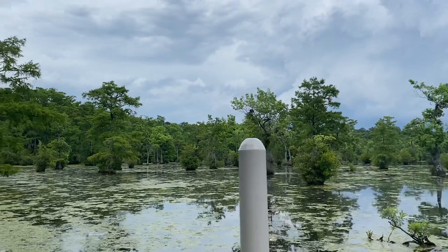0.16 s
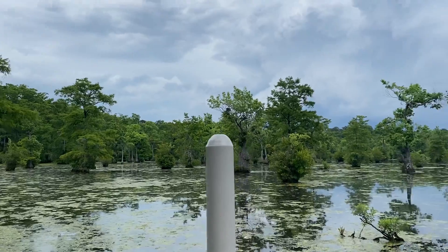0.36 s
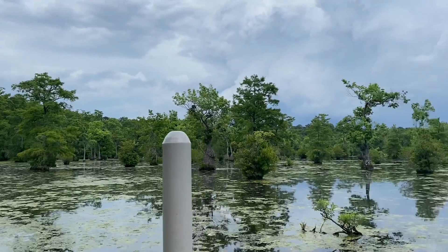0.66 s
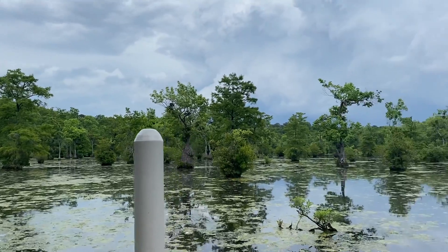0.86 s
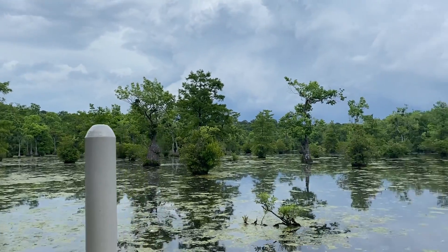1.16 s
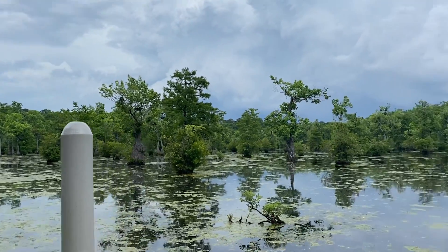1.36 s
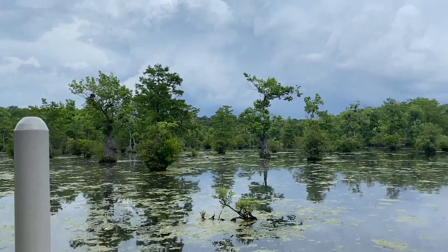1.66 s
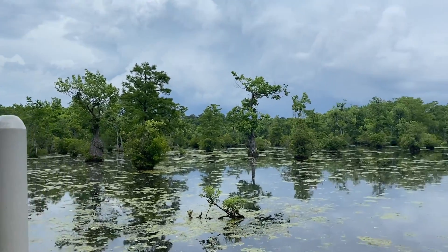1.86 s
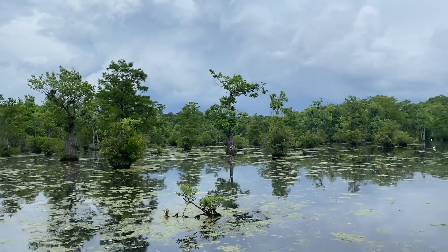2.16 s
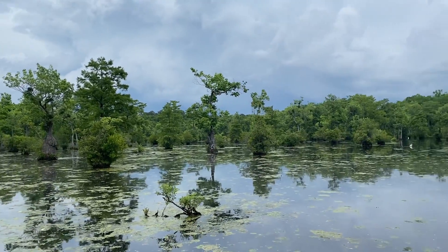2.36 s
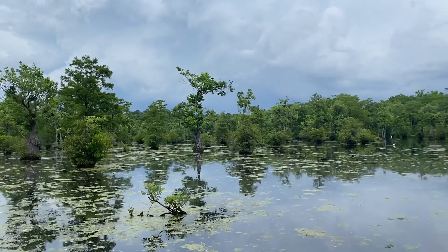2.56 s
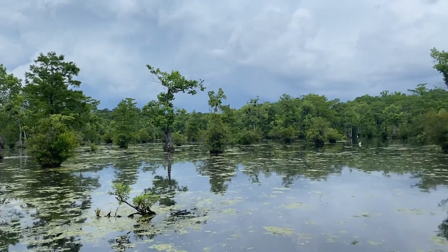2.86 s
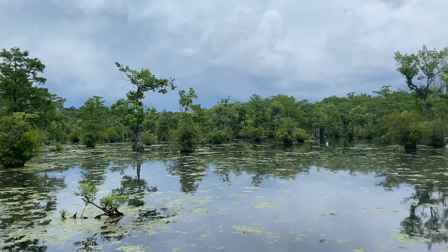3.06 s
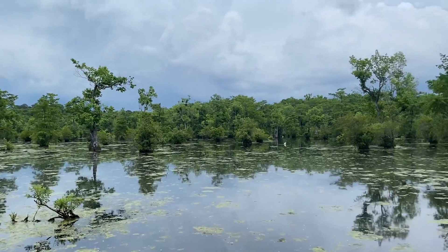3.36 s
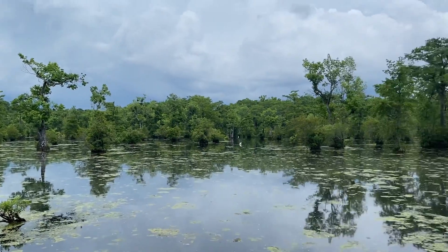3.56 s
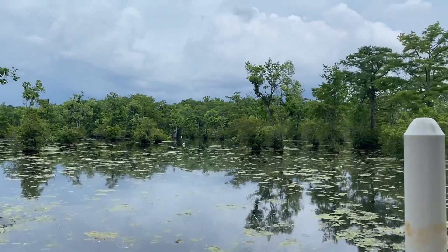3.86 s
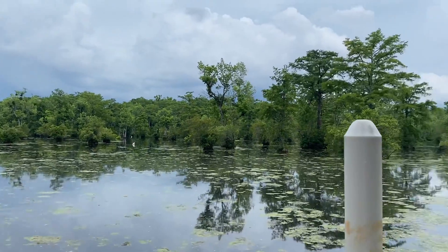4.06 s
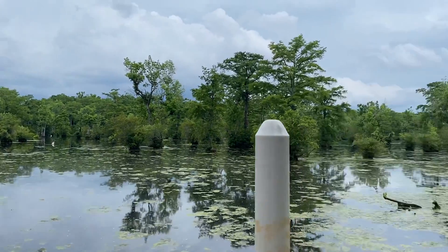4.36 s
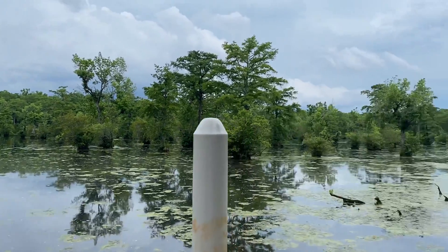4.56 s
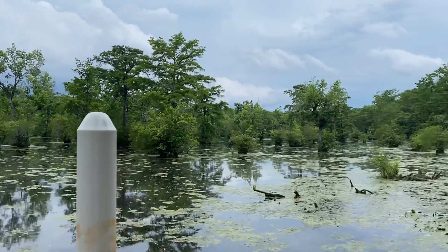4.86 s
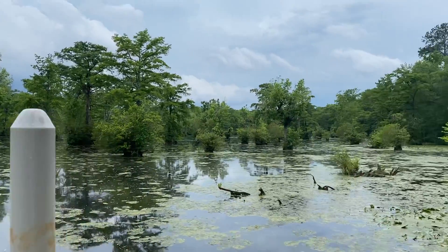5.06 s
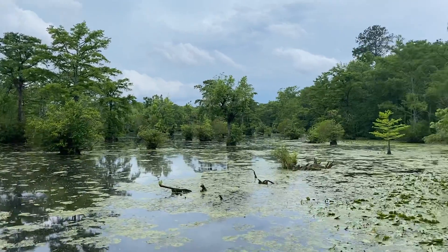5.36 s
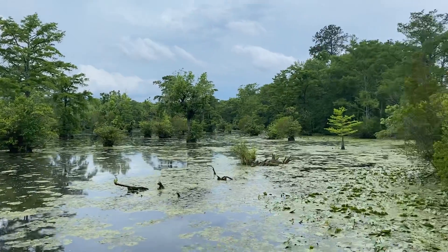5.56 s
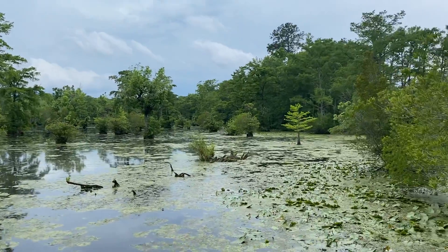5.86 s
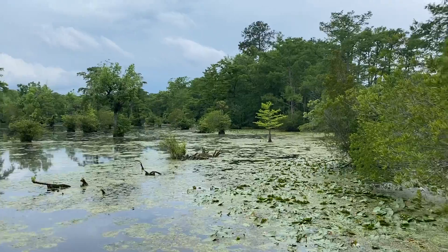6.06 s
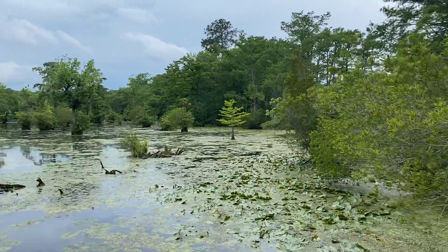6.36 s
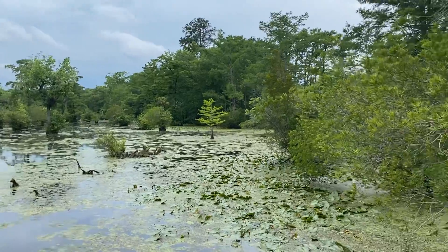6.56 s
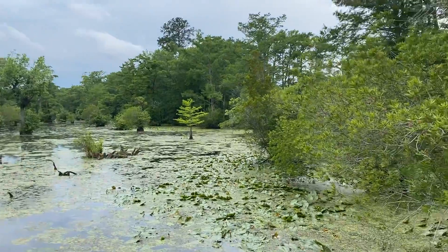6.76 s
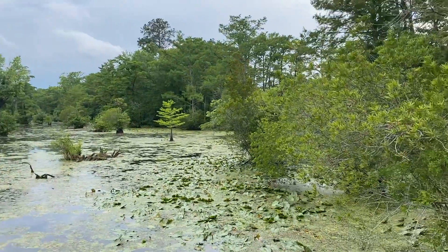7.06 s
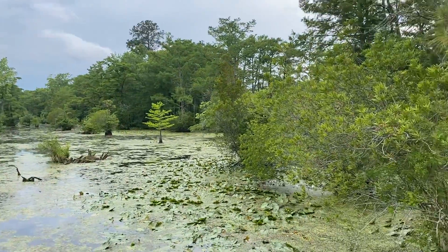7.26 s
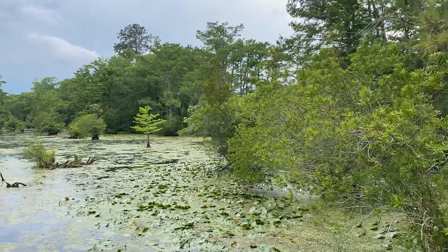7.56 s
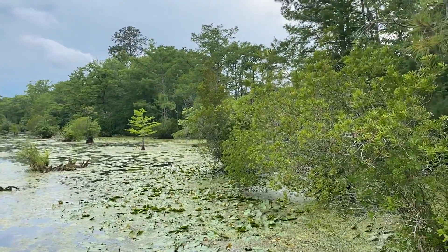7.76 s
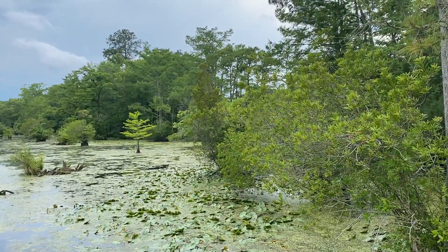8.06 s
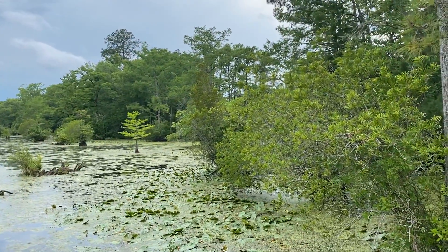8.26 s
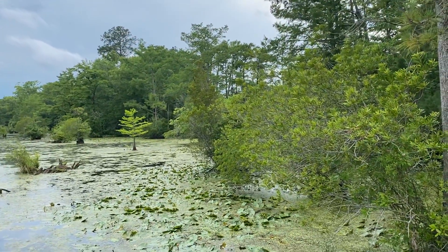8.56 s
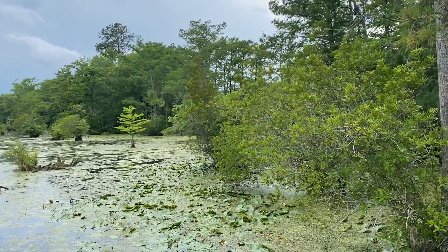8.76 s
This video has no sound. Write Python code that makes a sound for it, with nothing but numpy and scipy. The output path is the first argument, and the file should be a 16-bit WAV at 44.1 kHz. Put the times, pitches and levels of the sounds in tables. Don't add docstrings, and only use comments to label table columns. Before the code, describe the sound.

Many small frogs click and trill in short high bursts over still water, with sharp close snaps growing louder above a faint low rumble.

```python
import sys
import numpy as np
from scipy import signal
from scipy.fft import rfft, irfft
from scipy.io import wavfile
from scipy.ndimage import uniform_filter1d, map_coordinates

SR = 44100
rng = np.random.default_rng(int(sys.argv[2]) if len(sys.argv) > 2 else 0)


def log_audio(samples):
    frames = np.atleast_2d(samples).T
    limited = np.clip(frames, -1, 1)
    pcm = np.round(limited * 32767).astype(np.int16)
    wavfile.write(sys.argv[1], SR, pcm)


def volts_from_decibels(level):
    exponent = np.asarray(level, float) / 20
    return 10 ** exponent


N = 392490

# (time [s], peak [dB], left-right [dB], body noise [dB], sac pitch [Hz])
SNAPS = [
    (.833, -41.5, 11, -31, 3690),
    (2.8545, -35.5, 8.5, -34, 3480),
    (4.3304, -33.5, -0.5, -41, 3880),
    (4.9272, -26, 1, -42, 3750),
    (5.5715, -27, -1.5, -34, 3710),
    (6.0093, -29.5, -1, -25, 3770),
    (6.78, -24, 3, -33, 3660),
    (7.6008, -24.5, 2, -30.5, 3730),
    (8.239, -23.5, 1.5, -31, 3733),
    (8.8802, -20, 2, -34.5, 3826),
]
SIDE_SNAPS = [
    (3.7057, -38.5, 10, -28.5, 3550),
    (3.8594, -41.5, 11, -26, 3590),
    (6.1576, -32.5, 6.5, -25.5, 3585),
    (6.8818, -35.5, 1.5, -17, 3530),
    (7.7321, -34, 3.5, -19, 3400),
    (8.5464, -33, 3, -18, 3480),
]
# (low mode [dB], bright crack [dB])
SNAP_VOICES = [
    (-16, -28.5),
    (-8.5, -20.5),
]
# (multiple of sac pitch, level [dB], time to fall 60 dB [s])
SNAP_MODES = [(1, -2.5, 0.0096), (1.08, -3.5, 0.0076), (1.6, -25.5, 0.015)]
# (delay [s], level [dB])
SNAP_REPEATS = [(.0021, -6), (.0046, -11.5), (.0072, -15)]
# (frequency [Hz], level per Hz [dB])
SNAP_CRACK = [(2500, -50.5), (4500, 8), (6200, -4), (8000, -6), (10000, -19), (12000, -29), (14000, -17.5),
              (15700, -29)]
SNAP_BODY = [(600, -64), (1200, -17.5), (1500, -8), (2500, 0.5), (3500, 5.5), (4800, -7.5), (6000, -28.5),
             (9000, -75)]

# (time [s], peak [dB], length [s], tick ahead by [s])
SLOW_FROG = [
    (.0499, -45, .05, 0.029),
    (.636, -36, .066, 0.011),
    (1.2225, -33.5, .058, 0.0079),
    (1.769, -31.5, .05, 0.0088),
    (2.3901, -34, .04, 0.024),
    (2.9786, -34, .042, 0.026),
]
QUICK_FROG = [(2.036, -31.5, 0.016, 0.04), (2.608, -34, .024, 0.046), (3.1967, -33.5, .025, .0347),
              (3.4045, -30.5, .024, 0.047), (3.603, -33, .012, 0.042), (3.7878, -35.5, .024, 0.038),
              (3.991, -41, .028, 0.059), (4.378, -36, .018, 0.015), (4.5747, -37.5, .028, 0.055),
              (4.788, -32.5, .023, 0.036), (4.9876, -32.5, .02, .0428), (5.1736, -31, .025, .0318),
              (5.366, -31.5, .021, 0.045), (5.5674, -30.5, 0.0073, 0.034), (5.753, -33.5, .021, 0.029)]
# (sac pitch [Hz], rasp [dB], fade over the call [dB])
FROG_VOICES = [(3640, -23, -8), (3660, -27, -6)]
# (level against the call [dB], sac pitch [Hz], length [s], rasp [dB])
TICKS = [(-7, 3570, .003, -15), (-6, 3540, .009, -27.5)]
# (time [s], peak [dB], length [s], sac pitch [Hz])
SMALL_FROGS = [(.002, -48, .006, 3210), (.3, -52.5, .04, 2844), (.03, -52, .045, 2850),
               (.124, -46, .006, 3800), (0.167, -40.5, .007, 4250), (0.7635, -35.5, 0.007, 4145),
               (1.364, -36.5, .01, 3950), (1.924, -40.5, .016, 3990), (2.221, -48.5, .045, 4400),
               (2.262, -56, .02, 4440), (1.349, -47, .012, 3990), (1.186, -51, .004, 3460),
               (3.757, -40, .003, 3410), (5.333, -39, .003, 3490), (5.731, -39, .003, 3200),
               (2.364, -37, .003, 3630), (2.374, -42, .004, 3199), (2.717, -41.5, .019, 3920),
               (3.258, -45.5, .017, 4080), (4.9077, -34, .023, 4012), (5.106, -38.5, .011, 3917),
               (5.4587, -36, .022, 4091), (5.721, -37, .003, 3540), (5.744, -43, .035, 4370),
               (5.974, -39.5, .034, 3950), (6.5675, -37, .023, 4050), (6.6093, -36.5, .02, 3930),
               (6.846, -49, .041, 3980), (7.1483, -31, .019, 3940), (7.281, -35.5, .019, 3950),
               (7.545, -43, .003, 4160), (7.688, -35.5, .04, 4180), (8.256, -35, .038, 4060),
               (8.328, -36, .018, 4034)]
# (time [s], peak [dB], length [s], sac pitch [Hz], fade over the call [dB])
MIDDLE_FROGS = [(0.437, -50, 0.02, 3670, -10), (0.7218, -44, 0.022, 3775, -11),
                (0.844, -45.5, 0.035, 3750, -8.0), (1.4824, -47.5, 0.019, 3810, -7),
                (1.7243, -38, 0.015, 3780, -10), (1.8956, -38, 0.006, 3750, 7), (1.9, -39, 0.018, 3720, -9),
                (2.167, -46.5, 0.013, 3710, -9), (2.7759, -46.5, 0.04, 3870, -2),
                (2.842, -48, 0.012, 3740, 6.0), (2.926, -48, 0.02, 3610, -5),
                (4.1309, -46.5, 0.01, 3790, -9.0), (4.177, -46, 0.0084, 3460, -2),
                (4.36, -40, 0.018, 3740, 6), (4.52, -46, 0.011, 3645, -6), (4.859, -48, 0.04, 3560, -8),
                (4.957, -37, 0.026, 3880, -8), (5.017, -37.5, 0.025, 3780, -7), (5.17, -41, 0.006, 3590, 5),
                (5.685, -44.5, 0.027, 3840, -11), (5.738, -36.5, 0.015, 3600, 3),
                (5.773, -43, 0.034, 3800, -6), (5.8435, -38.5, 0.014, 3750, -0.5),
                (5.857, -35, 0.011, 3825, -7), (5.95, -42.5, 0.009, 3700, -12),
                (6.0857, -45, 0.035, 3650, -9), (6.4592, -37.5, 0.042, 3720, -1),
                (6.65, -40.5, 0.025, 3710, -2), (6.6976, -37, 0.01, 3690, -11.0),
                (7.063, -43.5, 0.016, 3765, -3), (7.3144, -43, 0.028, 3777, -5),
                (7.554, -40, 0.03, 3760, -9), (7.6375, -35.5, 0.009, 3910, -11),
                (8.035, -51, 0.014, 3840, -6), (8.172, -43, 0.028, 3618, 5), (8.2, -41.5, 0.03, 3640, -10),
                (8.373, -42, 0.035, 3686, 1), (8.414, -37, 0.011, 3810, -15),
                (8.612, -42.5, 0.017, 3770, -11)]
LARGE_FROGS = [(0.2637, -43.5, 0.016, 3680, -11.0), (0.469, -43, 0.022, 3640, -9),
               (0.7799, -42, 0.024, 3690, -4), (0.8937, -40.5, 0.03, 3570, -11.0),
               (1.1373, -43, 0.025, 3650, -10), (1.3016, -41, 0.013, 3740, -9),
               (1.639, -42.5, 0.025, 3685, -7), (1.866, -46, 0.01, 3610, -1.0),
               (2.4862, -40.5, 0.036, 3650, -5), (2.52, -44, 0.022, 3640, -9),
               (2.953, -45, 0.0076, 3560, -11), (3.106, -43, 0.019, 3760, -8), (3.31, -44, 0.027, 3690, -5),
               (3.9738, -46, 0.0056, 3660, -13), (4.208, -42, 0.048, 3600, 0), (4.34, -41, 0.017, 3820, -6),
               (4.493, -48.5, 0.027, 3660, -7.0), (5.2724, -41, 0.028, 3780, -4),
               (6.206, -42, 0.03, 3710, 1), (6.287, -44, 0.052, 3660, -11), (7.033, -45, 0.028, 3630, 5.5),
               (7.1236, -41.5, 0.0033, 3455, -2), (7.131, -34, 0.017, 3640, 1.5),
               (7.745, -44.5, 0.03, 3660, -8.0), (7.825, -37.5, 0.018, 3630, 1),
               (7.844, -37, 0.024, 3766, -8), (8.1255, -41, 0.035, 3720, -6), (8.514, -43.5, 0.03, 3740, 3),
               (8.5858, -36.5, 0.03, 3680, 1.5), (8.795, -41.5, 0.039, 3760, -5)]
# (frequency [Hz], level per Hz [dB])
RASP_COLOUR = [(900, -42), (1500, -18), (2450, -15), (2800, -2), (4400, -4), (5500, -12), (6200, -17),
               (7300, -18), (8400, -23), (10300, -39), (12000, -42.5), (14000, -40), (15700, -58)]
# (frequency [Hz], level [dB])
WATER_CANCEL = [(1000, -1.5), (1900, -2), (2450, -4.5), (2800, 0.5), (4300, -0.5), (4800, -2.5), (6500, 0),
                (16000, 0)]
# (time [s], left leads by [radians], left-right [dB])
BEARING = [(0, -1.2, 2), (1, -2.3, 7), (1.5, -2.8, 9), (2.5, -2.1, 9), (3.7, -1.9, 8), (4.2, -.5, 3),
           (5, .5, 1), (5.6, 1.2, 2.5), (6.1, 1.4, 4.5), (6.5, .3, 3.5), (7, .8, 3.5), (8.9, .7, 3.5)]

# (time [s], level [dB])
FAR = [(0.0, -53), (0.45, -63), (1.1, -63), (1.5, -61), (2.3, -62.5), (3.17, -59.5), (3.47, -56),
       (4.1, -57), (4.83, -59), (4.96, -61.5), (5.77, -52.5), (6.49, -61.5), (6.64, -56.5), (7.56, -61.5),
       (7.71, -57.5), (8.13, -64), (8.33, -54), (8.9, -62.5)]
# (time [s], level [dB])
FACING = [(0, -3.5), (2.3, -5), (3.3, 3.5), (4.5, 1), (6, 2), (8.9, -1)]
# (frequency [Hz], time to fall 60 dB [s])
TREES = [(1000, 0.6), (4000, 0.29), (7000, 0.36), (10000, .16)]

# (time [s], peak [dB], pitch [Hz], time
# to fall 60 dB [s], roughness)
KNOCKS = [(.138, -67, 800, 0.02, 1.9), (.168, -62, 905, 0.023, 3.2), (.2555, -43, 600, 0.039, 0.19),
          (.362, -63.5, 1214, 0.051, 2.9), (3.121, -54, 784, 0.033, 2), (4.028, -62, 1700, .02, 3),
          (4.041, -57, 1690, 0.026, 3), (4.059, -54.5, 1320, 0.037, 3.2), (4.925, -55, 915, 0.057, 2.5),
          (5.662, -53, 1080, 0.1, 3.6), (5.739, -59.5, 590, 0.048, 2.2), (5.77, -51, 1850, 0.032, 0.91),
          (5.851, -54.5, 910, 0.024, 0.48), (5.99, -61, 870, 0.045, 0.65), (6.312, -49, 1433, 0.036, 0.65),
          (6.314, -52, 1107, 0.051, 1.2), (6.313, -53, 750, .04, 1.6), (6.315, -53, 398, 0.056, 0.9),
          (.257, -54, 400, .05, 0.88), (2.302, -72, 6940, 0.009, 5.8), (8.077, -61.5, 1700, 0.036, 1)]
# (time [s], peak [dB], pitch [Hz], time to fall 60 dB [s])
THUMPS = [
    (3.126, -50.5, 148, 0.098),
    (4.926, -41, 106, 0.11),
    (6.308, -51, 200, 0.052),
    (7.247, -28.5, 81, 0.058),
]
# (time of peak [s], level [dB], rise [s], fall [s])
CREAKS = [
    (.266, -63, 0.0079, 0.083),
    (5.676, -70, 0.14, .045),
    (6.43, -59, 0.13, .09),
    (6.53, -66.5, 0.053, 0.058),
    (6.34, -66, .02, .05),
]
# (time [s], level [dB], length [s])
RUSTLES = [(1.3, -92, .06), (1.44, -86, .008), (3.221, -76, .005), (3.225, -86, .025), (7.61, -80, .035),
           (6.79, -82, .06), (6.89, -80, .03), (7.74, -82, .05), (5.658, -74, 0.043), (5.715, -79.5, 0.066),
           (6.328, -73, 0.0055), (6.338, -76, .004), (6.349, -70, .005), (6.372, -75.5, 0.11),
           (7.116, -78, 0.095), (7.826, -80, 0.055), (8.56, -79, 0.086)]

# (time [s], level [dB])
BREEZE = [
    (7.2, -100),
    (7.5, -78),
    (8.0, -81),
    (8.5, -82.5),
    (8.9, -80.5),
]
# (frequency [Hz], level per Hz [dB])
LEAVES = [(500, -31), (850, -0.5), (1100, 0), (1500, -10), (2500, -29), (5000, -70)]
BOUGHS = [(120, -29.5), (250, 1), (570, 0), (1200, -6), (2200, -14), (4000, -29), (6000, -72)]
AIR = [(150, -17), (330, -4.5), (570, 1), (1200, -13), (2100, -12.5), (5000, -26), (7500, -29.5),
       (9200, -25.5), (11000, -30), (13000, -43), (15500, -59)]
RUMBLE = [(15, -49.5), (25, -21.5), (40, -6), (59, 1.5), (87, 0), (116, -6), (175, -14), (240, -22.5),
          (323, -32), (500, -54.5), (900, -110)]
# (time [s], level [dB])
GROUND = [(0, -51.5), (.9, -55), (2.36, -54.5), (2.91, -51), (3.61, -57.5), (4.07, -53), (7.2, -53),
          (8.65, -55), (8.9, -52)]

# (frequency [Hz], likeness 0 to 1)
ALIKE = [(40, 1), (125, 0.94), (300, 0.66), (700, 0.5), (2000, 0.52), (12000, 0.57)]
# (frequency [Hz], left leads by [radians])
PORTS = [(300, 0), (600, -1.1), (1460, -2), (4000, 0), (6500, -1), (14000, 0.5)]
# (frequency [Hz], share)
ONE_PATH = [(4600, 0.022), (6400, 0.55), (8000, 0.77)]
# (frequency [Hz], left leads by [radians])
PATH_LEAD = [(6700, 0), (8450, -3.14), (10200, -6.28), (11900, -9.42), (13900, -12.57), (15700, -15.7)]

SHADE_PER_DB = 0.9
THROAT_PER_DB = 0.5
LAST_PULSES_DB = -4.5
SMALL_RASP_DB, MIDDLE_RASP_DB, LARGE_RASP_DB = -25, -20.5, -22
SMALL_FADE_DB, USUAL_FADE_DB = -3.5, -9.5
QUICK_ECHO_DB, OTHERS_ECHO_DB = -9, -6.5
AIR_DB, AIR_FOLLOWS = -75.5, 0.4
BOUGHS_DB = 8
GROUND_PAN_DB = -1
EARS = np.array([[0.5], [-0.5]])


def unit(x):
    return x / np.sqrt(np.mean(x ** 2) + 1e-20)


def along(points, hz):
    f, v = np.transpose(points)
    return np.interp(np.log(hz + 1), np.log(f + 1), v)


def curves(rows):
    s, *cols = np.transpose(rows)
    return [np.interp(np.arange(N) / SR, s, c) for c in cols]


def wobble(rate):
    knots = rng.standard_normal(int(N * rate / SR) + 4)
    return map_coordinates(knots, [np.arange(N) * rate / SR])


def coloured(x, spectrum):
    cep = irfft(np.log(volts_from_decibels(along(spectrum, np.fft.rfftfreq(2048, 1 / SR)))))
    cep[1:1024] *= 2
    cep[1025:] = 0
    h = irfft(np.exp(rfft(cep)))[:1024]
    h = h / np.linalg.norm(h)
    return signal.fftconvolve(x, h[None], axes=1)[:, :x.shape[1]]


def laid(s, waves):
    at = np.round(s * SR).astype(int)[:, None] + np.arange(waves.shape[1])
    return np.bincount(at.ravel(), waves.ravel(), N + SR)[:N]


def swell(t, rise):
    return 1 - np.exp(-t / rise)


def close_frog():
    t = np.arange(1600) / SR
    out = np.zeros((2, N + SR))
    groups = zip((SNAPS, SIDE_SNAPS), SNAP_VOICES)
    snaps = [(*row, *voice) for rows, voice in groups for row in rows]
    for s, db, pan_db, body_db, sac_hz, low_db, bright_db in snaps:
        pulse = 0
        for multiple, level, t60 in SNAP_MODES:
            mode_hz = sac_hz * multiple * rng.normal(1, 0.012)
            pulse = pulse + volts_from_decibels(level + rng.normal(0, 3.0) - 60 * t / t60) * np.sin(2 * np.pi * mode_hz * t)
        pulse = pulse * swell(t, 0.00046) ** 2
        ring = pulse
        for later, level in SNAP_REPEATS:
            wait = round(later * rng.normal(1, 0.07) * SR)
            ring = ring + volts_from_decibels(level + rng.normal(0, 1.7)) * np.pad(pulse, (wait, 0))[:len(t)]
        ring = ring / np.abs(ring).max()

        low_hz = 0.775 * sac_hz * rng.normal(1, 0.025)
        low = np.sin(2 * np.pi * low_hz * t - 13 * np.exp(-t / 0.0033))
        low = low * volts_from_decibels(low_db + 15.0 - 60 * t / 0.022) * swell(t, 0.0018) ** 2

        hiss = rng.standard_normal(len(t)) + 0.89 * rng.standard_normal((2, len(t)))
        puff = volts_from_decibels(-60 * t / 0.042) * swell(t, 0.00058) * hiss
        body = volts_from_decibels(body_db + 10.5) * coloured(puff, SNAP_BODY)
        crack = volts_from_decibels(bright_db + 10.5 - SHADE_PER_DB * abs(pan_db)) * coloured(puff, SNAP_CRACK)

        snap = ring + low * volts_from_decibels([[-1.5], [1.5]]) + body + crack
        out[:, round(s * SR):][:, :len(t)] += volts_from_decibels(db - 1.5 + EARS * pan_db) * snap
    return out[:, :N]


def frogs(calls, rasp_db, low_db, rise=0.00085, ring=0.0082):
    s, db, hz, length, harsh_db, fade_db = np.transpose(calls)[:, :, None]
    k = np.arange(20)
    late, strong, sharp = rng.standard_normal((3, len(calls), 20))
    turn, haste, throaty, raspy, aside, shrill = rng.standard_normal((6, len(calls), 1))
    long_call = length > 0.046

    rate = 285 + 0.08 * (hz - 3700) - 900 * length + 18 * haste
    since = k / rate * (1 + 0.01 * k) + 0.00015 * late * (k > 0)
    size = volts_from_decibels(db - np.maximum(fade_db, 0) + fade_db * since / (length + 0.0078) + 1.3 * strong)
    size = size * volts_from_decibels(-9 * np.exp(-since / 0.011) * long_call)
    size = size * volts_from_decibels(LAST_PULSES_DB * (since / (length + 0.004)) ** 4)
    on = since < length

    def pick(v):
        return np.broadcast_to(v, on.shape)[on][:, None]

    def sine(angle):
        return np.sin(angle.astype(np.float32))

    start, t = pick(s + since), np.arange(280) / SR
    when, facing, pan_db = np.transpose(BEARING)
    lead = np.interp(start, when, facing) + pick(0.46 * turn)
    pan_db = np.interp(start, when, pan_db) + pick(1.6 * aside)
    off_axis_db = np.abs(pan_db)

    shape = swell(t, rise) ** 2 * volts_from_decibels(-60 * t / ring)
    shape = shape / shape.max()
    phase = 2 * np.pi * pick(hz * (1 + 0.009 * sharp)) * t
    throat = volts_from_decibels(low_db + THROAT_PER_DB * (off_axis_db - 4.0) + pick(2.8 * throaty)) * shape ** 0.75
    rasp = volts_from_decibels(rasp_db + pick(harsh_db + 3 * raspy) + 2.5 - SHADE_PER_DB * off_axis_db) * shape ** 0.7
    rasp = rasp * rng.standard_normal(phase.shape)
    upper = volts_from_decibels(pick(harsh_db + 5 * long_call - 0.0081 * (hz - 3700)) + 3) * shape ** 1.6
    chest = volts_from_decibels(-37 + pick(9 * long_call)) * np.sqrt(shape)
    top = volts_from_decibels(-29.5 - 1.5 * off_axis_db + pick(9 * long_call + 3 * shrill)) * shape ** 1.4
    reach = 1.4 + pick(0.04 * late)
    dip = 0.81 + pick(0.025 * strong)

    sacs, rasps = [], []
    for side in (0.5, -0.5):
        gain = pick(size) * volts_from_decibels(side * pan_db)
        shift = side * lead
        tone = shape * sine(phase + shift)
        tone = tone + throat * sine(dip * phase + shift)
        tone = tone + upper * sine(reach * (phase + shift))
        tone = tone + top * sine((0.45 + reach) * (phase + shift))
        tone = tone + chest * sine(0.446 * phase + shift)
        sacs.append(laid(start[:, 0], gain * tone))
        delay = shift[:, 0] / 2 / np.pi / -3700 + 0.000993
        rasps.append(laid(start[:, 0] + delay, gain * rasp))
    return np.array(sacs) + coloured(np.array(rasps), RASP_COLOUR)


def nearby_calls():
    voiced, ticks = [], []
    for rows, voice, tick in zip((SLOW_FROG, QUICK_FROG), FROG_VOICES, TICKS):
        hz, *rest = voice
        under_db, *tick_voice = tick
        voiced.append([(s, db, hz, length, *rest) for s, db, length, _ in rows])
        ticks.append([(s - ahead, db + under_db, *tick_voice, USUAL_FADE_DB) for s, db, _, ahead in rows])
    others = voiced[0] + ticks[0]
    others += [(s, db, hz, length, SMALL_RASP_DB, SMALL_FADE_DB) for s, db, length, hz in SMALL_FROGS]
    for rows, rasp_db in ((MIDDLE_FROGS, MIDDLE_RASP_DB), (LARGE_FROGS, LARGE_RASP_DB)):
        others += [(s, db, hz, length, rasp_db, fade_db) for s, db, length, hz, fade_db in rows]
    return voiced[1] + ticks[1], others


def trees(x, count=30):
    size = N // count + 1
    hz, t, z = signal.stft(rng.standard_normal((count, 2, SR // 3)), SR, nperseg=256)
    tails = signal.istft(z * volts_from_decibels(-60 * t / along(TREES, hz)[:, None]), SR, nperseg=256)[1]
    tails = tails / np.linalg.norm(tails, axis=2, keepdims=True)
    late = np.pad(x, ((0, 0), (130, size)))[:, :count * size]
    pieces = late.reshape(2, count, size).transpose(1, 0, 2)
    wet = signal.fftconvolve(pieces, tails, axes=2)
    return np.array([laid(np.arange(count) * size / SR, wet[:, ear]) for ear in range(2)])


def far_chorus(count=620):
    luck = rng.random((count, 6))
    luck[:, 2] = (luck[:, 2] + rng.random(count)) / 2
    calls = luck * [N / SR, 12, 1400, 0.03, 10, 8] + [0, -12, 3000, 0.008, -27, -12]
    calls[:, 4] += np.interp(calls[:, 0], *np.transpose(FACING))
    calls[:4, 0] = 0
    direct = frogs(calls, rasp_db=5.0, low_db=-11.5)
    blur = 1.1 * direct + trees(direct, count=12)
    loudness = np.abs(uniform_filter1d(np.mean(blur ** 2, 0), SR // 8))
    blur = blur / np.sqrt(loudness + 1e-9)
    return blur * volts_from_decibels(curves(FAR)[0] - 2.0)


def dock():
    t = np.arange(6000) / SR
    s, db, hz, t60, rough = np.transpose(KNOCKS)[:, :, None]
    drift = uniform_filter1d(np.cumsum(rng.standard_normal((len(s), len(t))), 1), 12, 1)
    tone = np.sin(2 * np.pi * hz * t + 0.152 * rough * drift)
    knocks = laid(s[:, 0], volts_from_decibels(db + 1.0 - 60 * t / t60) * swell(t, 0.0013) * tone)

    s, db, hz, t60 = np.transpose(THUMPS)[:, :, None]
    tone = np.sin(2 * np.pi * hz * t - 5 * np.exp(-t / 0.0042))
    thumps = laid(s[:, 0], volts_from_decibels(db + 19.0 - 60 * t / t60) * swell(t, 0.014) ** 2 * tone)

    board = [(100, -64), (300, -24.5), (430, -8), (560, 3.0), (720, -10.5), (1000, -19.5),
             (1500, -21), (2500, -34), (6000, -100)]
    slips = unit(coloured(volts_from_decibels(2.2 * wobble(60)) * rng.standard_normal((1, N)), board)[0])
    now = np.arange(N) / SR
    creak = sum(volts_from_decibels(db) * np.interp(now, [s - rise, s, s + fall], [0, 1, 0]) for s, db, rise, fall in CREAKS)
    return knocks + thumps + slips * creak


def rush(spectrum, patchy_db):
    z = signal.stft(rng.standard_normal((2, N + 512)), nperseg=512)[2]
    field = uniform_filter1d(rng.standard_normal(z.shape[1:]), 6, 0)
    field = unit(uniform_filter1d(field, 12, 1))
    pair = rfft(signal.istft(z * volts_from_decibels(patchy_db * field), nperseg=512)[1][:, :N])
    hz = np.fft.rfftfreq(N, 1 / SR)
    turn = np.arccos(np.clip(along(ALIKE, hz), -1, 1)) / 2
    mid, side = pair * volts_from_decibels(along(spectrum, hz)) * [np.cos(turn), np.sin(turn)]
    lead = np.exp(0.5j * along(PORTS, hz))
    return unit(irfft([(mid + side) * lead, (mid - side) / lead], N))


def sleeve():
    now = np.arange(N) / SR
    strokes = sum(volts_from_decibels(db) * np.sin(np.pi * np.clip((now - s) / length, 0, 1)) for s, db, length in RUSTLES)
    cloth = [(5000, -38), (8000, -6), (11000, -11), (12200, -14), (13800, -1), (15200, -11), (16000, -43)]
    return strokes * rush(cloth, patchy_db=4.5)


def breeze():
    leaves = rush(LEAVES, patchy_db=1.5)
    boughs = volts_from_decibels(BOUGHS_DB) * rush(BOUGHS, patchy_db=2.5)
    return volts_from_decibels(curves(BREEZE)[0]) * (leaves + boughs)


def rumble_and_air():
    rumble_db = curves(GROUND)[0]
    rumble = volts_from_decibels(rumble_db + 1.4 * wobble(7)) * rush(RUMBLE, patchy_db=0.5)
    air = volts_from_decibels(AIR_DB + AIR_FOLLOWS * (rumble_db - rumble_db.mean())) * rush(AIR, patchy_db=2.0)
    return (rumble + air) * volts_from_decibels(EARS * GROUND_PAN_DB)


def scene():
    snaps = close_frog()
    quick, others = nearby_calls()
    quick = volts_from_decibels(-0.6) * frogs(quick, rasp_db=4.0, low_db=-17.0, rise=0.0006, ring=0.0095)
    others = volts_from_decibels(-2.0) * frogs(others, rasp_db=2.5, low_db=-15.0)
    echo = trees(volts_from_decibels(QUICK_ECHO_DB) * quick + volts_from_decibels(OTHERS_ECHO_DB) * others + volts_from_decibels(-13) * snaps)
    over_water = coloured(quick + others + echo + far_chorus(), WATER_CANCEL)
    return over_water + snaps + dock() + sleeve() + breeze() + rumble_and_air()


def top_cut(x):
    return signal.sosfilt(signal.butter(12, 15780, fs=SR, output="sos"), x)


def record(dry):
    hz = np.fft.rfftfreq(N, 1 / SR)
    left, right = rfft(dry)
    mid = (left + right) / 2
    side = (left - right) / 2 * (1 - np.clip(along(ONE_PATH, hz), 0, 1))
    lead = np.exp(0.5j * along(PATH_LEAD, hz))
    mix = irfft([(mid + side) * lead, (mid - side) / lead], N)
    return top_cut(mix)


dry = scene()
out = record(dry)
log_audio(out)
```